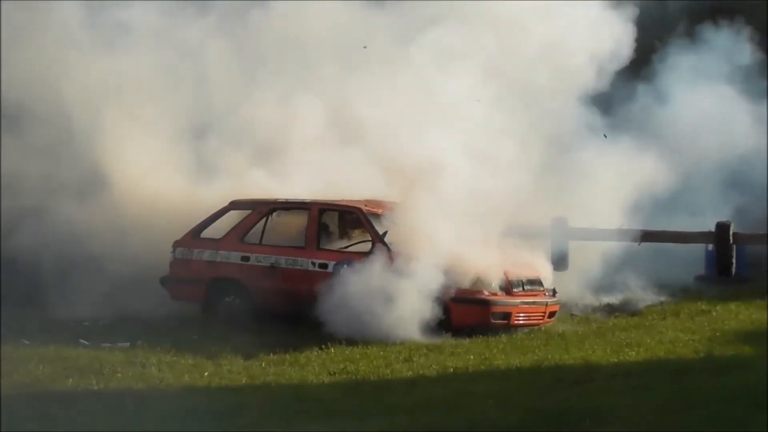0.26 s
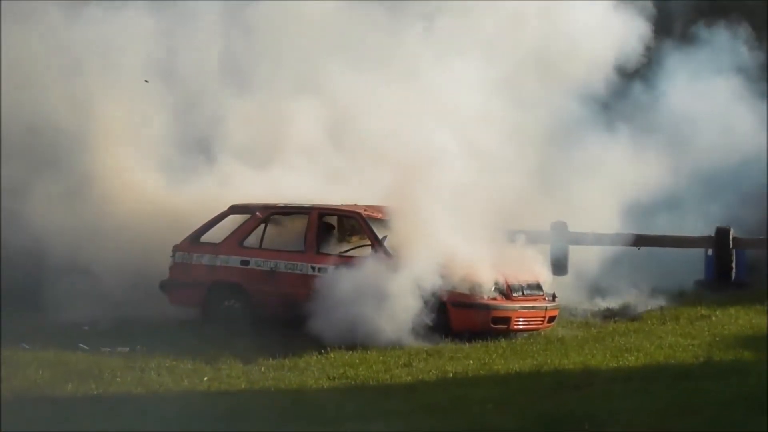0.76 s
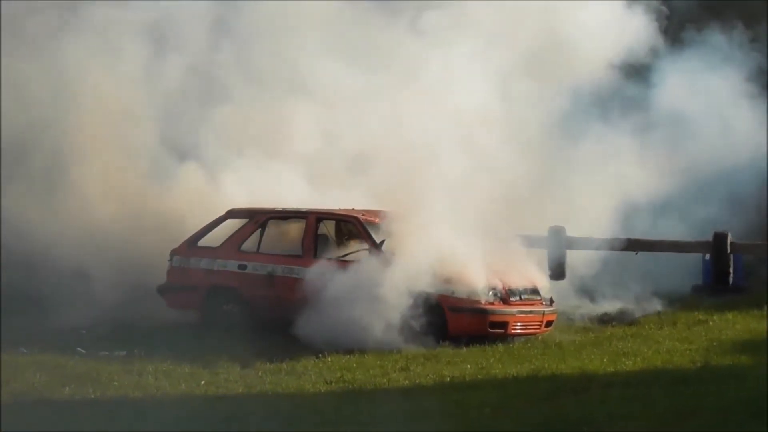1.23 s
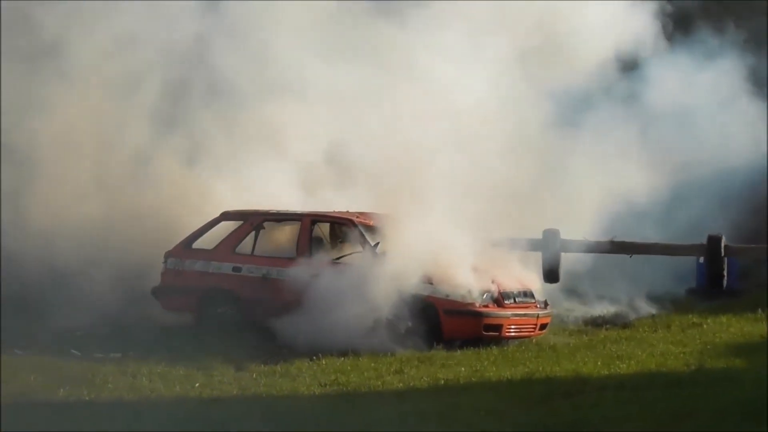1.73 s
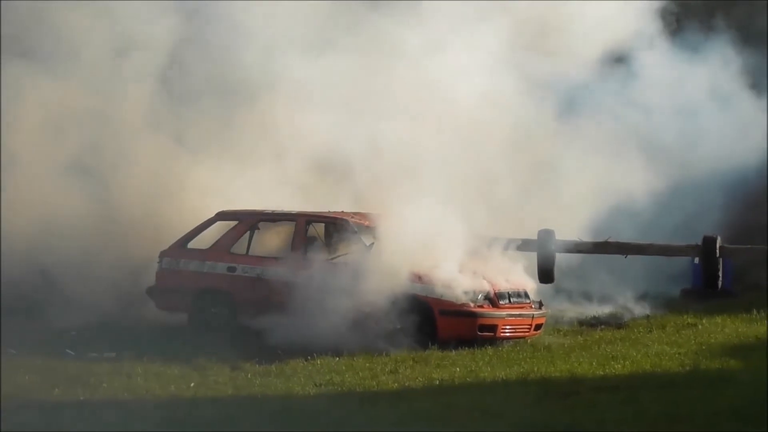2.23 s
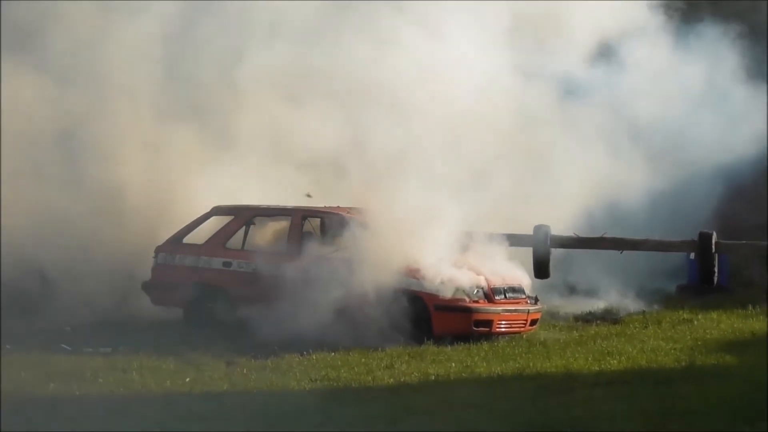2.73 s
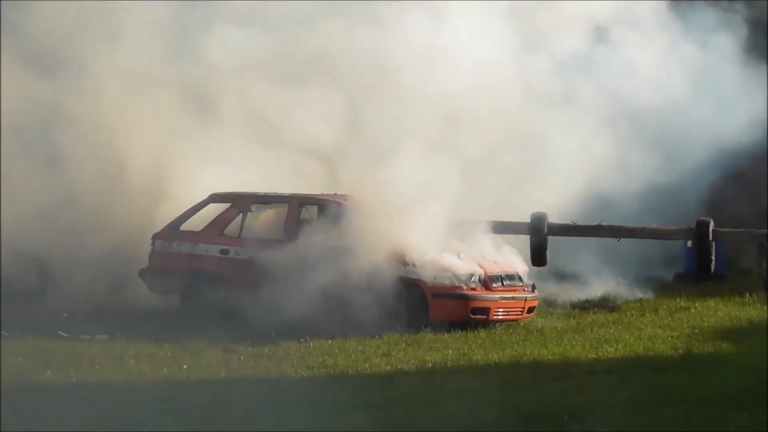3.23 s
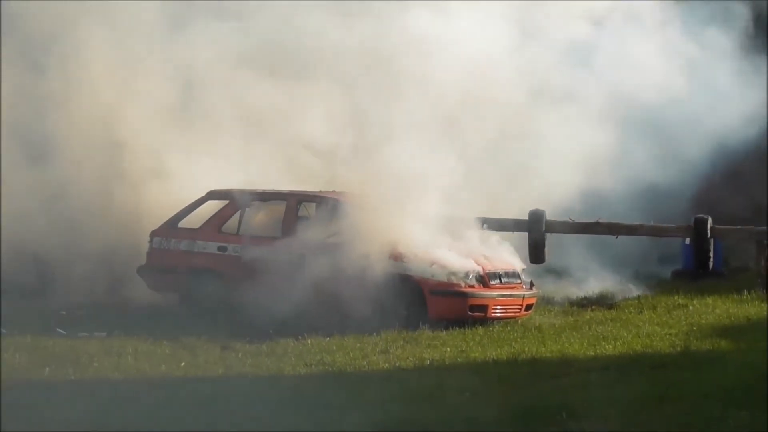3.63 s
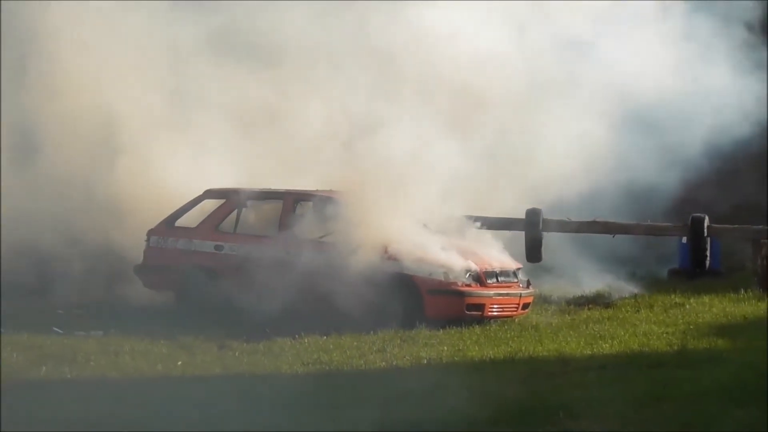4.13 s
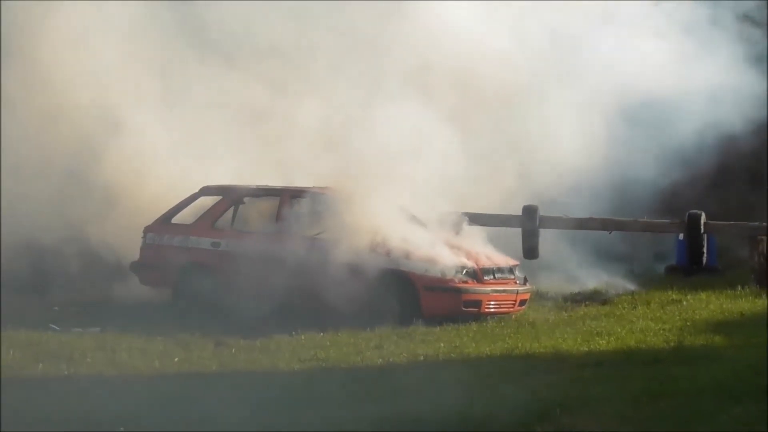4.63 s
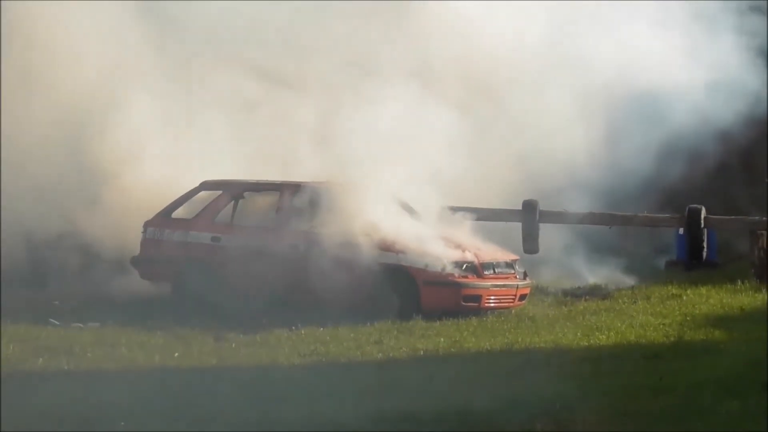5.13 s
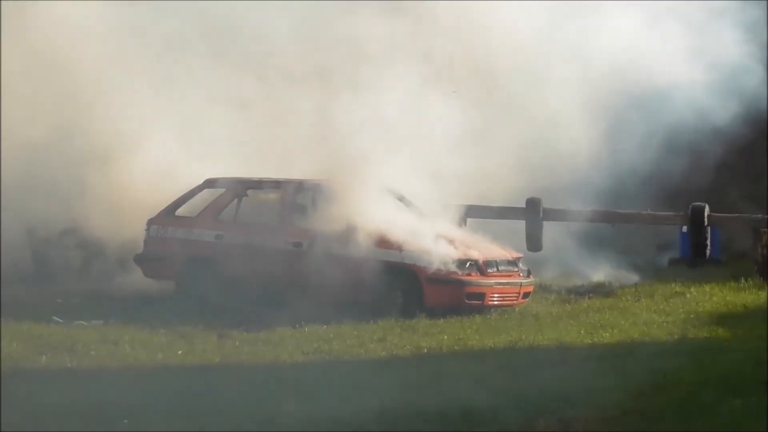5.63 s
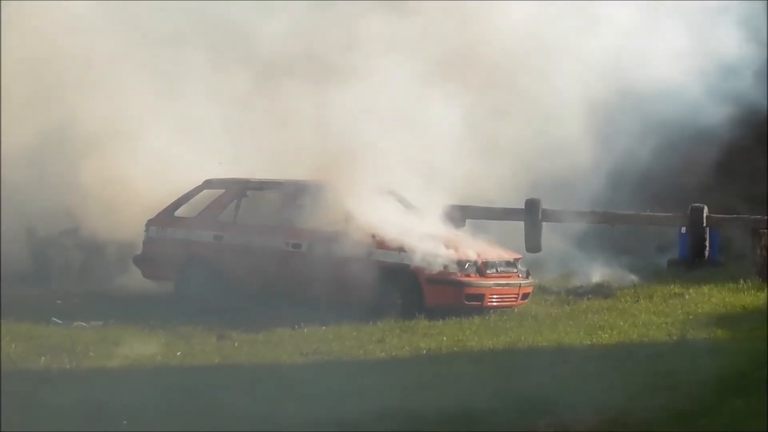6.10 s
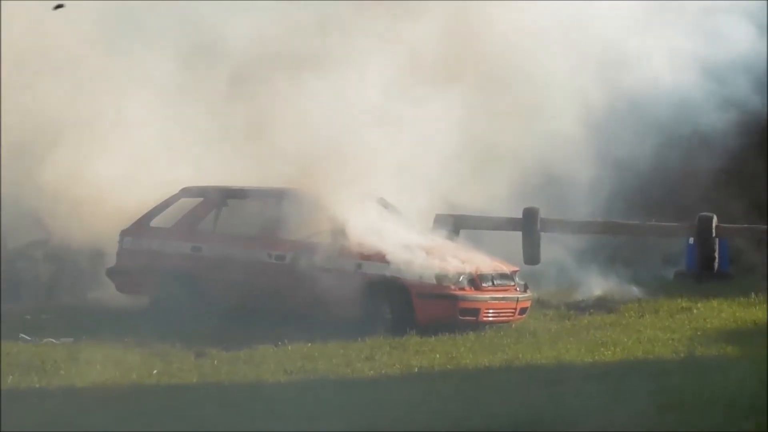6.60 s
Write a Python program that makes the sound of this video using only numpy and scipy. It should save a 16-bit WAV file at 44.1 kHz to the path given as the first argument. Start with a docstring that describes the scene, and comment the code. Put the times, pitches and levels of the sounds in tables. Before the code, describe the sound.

Loud machine gun fire is under way from the start on an outdoor range. A heavy gun pounds steadily at about nine rounds a second, each shot a deep thump with a hard midrange bark. A faster, lighter gun rattles over it until about 0.8 seconds. The heavy gun continues alone while bullets crack and strike downrange. Around 5.1 seconds another heavy gun takes over with a few quick rounds, followed by two-shot bursts at 5.6 and 6.1 seconds and a single shot at 6.8. Brief pings of bullets hitting a car's sheet metal come at about 3.4, 5.4 and 6.3 seconds. Each blast slaps back from nearby walls with a hollow knock, and echoes from trees and distant hills roll through the gaps. The small microphone is close to the firing line and overloads, giving the shots a crunchy edge.

```python
"""A heavy machine gun on an outdoor range, about nine rounds a second, close to an overloaded pocket mic.
The mic is near the firing line. A faster gun joins for the first second; another heavy gun ends the
barrage in short bursts. Each muzzle blast is a pressure wave with a bark of jetting gas. It returns from
nearby walls, scatters off the ground and echoes from the trees, the berm and the distant hills.
Downrange, bullets crack and strike sheet metal."""
import sys
import numpy as np
from scipy import signal
from scipy.io import wavfile

SR = 44100
rng = np.random.default_rng(int(sys.argv[2]) if len(sys.argv) > 2 else 0)


def to_wav(sig):
    """Store sig (one row per channel, or 1-D mono) as 16-bit WAV at the path in sys.argv[1].

    Samples outside -1..1 are clipped; the rate is SR.
    """
    pcm = np.clip(np.atleast_2d(sig), -1, 1) * 32767
    pcm = np.round(pcm).astype(np.int16)
    wavfile.write(sys.argv[1], SR, pcm.T)  # frames by channels


N = 302526

# rounds of the heavy guns: t/s, blast level/dB, bark level/dB
HEAVY_ROUNDS = [(0.0026, -5, -28), (0.106, -7, -8), (0.227, -1.5, -7), (0.3264, -6, -9.5),
                (0.443, -10.5, -12), (0.559, -8, -14), (0.6712, -14, -9), (0.7753, -6.5, -19),
                (0.881, -4, -29), (0.9951, -7, -11.5), (1.1025, -9, -8), (1.2093, -6.5, -12),
                (1.3266, -7.5, -10), (1.4347, -4.5, -12.5), (1.5436, -7, -10.5), (1.652, -6.5, -10),
                (1.7608, -4.5, -12), (1.8728, -4, -21), (1.991, -8, -10.5), (2.0926, -7, -9.5),
                (2.2, -7, -11), (2.3119, -5, -7), (2.428, -7.5, -9), (2.537, -11, -6.5),
                (2.6555, -3.5, -10.5), (2.761, -6.5, -11.5), (2.871, -2.5, -14), (2.972, -5.5, -14),
                (3.0938, -5, -14), (3.2028, -10, -7.5), (3.3152, -6, -9), (3.44, -7.5, -9.5),
                (3.5538, -5, -14), (3.6694, -5.5, -11), (3.784, -7, -12), (3.8974, -2.5, -18),
                (4.019, -5, -16), (4.1393, -4.5, -21), (4.2628, -7, -9.5), (4.3766, -2.5, -11),
                (4.4964, -8, -8), (4.6042, -11.5, -9.5), (4.7198, -5.5, -12.5), (4.84, -3.5, -29),
                (4.9522, -1, -12.5), (5.064, -6, -8.5), (5.143, -3.5, -10), (5.177, -4.5, -11),
                (5.2384, -3, -13), (5.6033, -1.5, -9.5), (5.7026, -3.5, -23), (6.069, -5, -8.5),
                (6.1653, -2.5, -14), (6.8123, -7.5, -6)]
# rounds of the fast gun: t/s, blast level/dB, bullet strike level/dB
FAST_ROUNDS = [(0.022, -26, -15), (0.0946, -4, -16.5), (0.164, -9, -8.5), (0.2352, -19, -9),
               (0.3042, -10, -11), (0.3757, -4, -22), (0.4481, -9, -13), (0.5203, -22, -11),
               (0.595, -2, -14), (0.6652, -8, -12), (0.735, -12, -11), (0.8037, -17, -32)]
HEAVY_TIMES, FAST_TIMES = np.array(HEAVY_ROUNDS)[:, 0], np.array(FAST_ROUNDS)[:, 0]
BAND_EDGES_HZ = 36 * 2 ** np.arange(0, 9.1, .5)   # half octaves
BURSTS_FROM_S = 5.14   # the other heavy gun takes over


def amp(db):
    """Decibels to gain; amp(2 * db) is power."""
    return 10 ** (np.asarray(db) / 20)


def at_hz(points, hz):
    """Reads a curve on a log-frequency axis."""
    freqs, values = np.transpose(points)
    return np.interp(np.log(hz), np.log(freqs), values)


def clicks(seconds, heights):
    """One sample of the given height at each time."""
    out = np.full(N, 1e-18)
    np.add.at(out, (np.asarray(seconds) * SR).astype(int), heights)
    return out


def dying(x, t60):
    """Gives each click a power tail falling 60 dB in t60 seconds."""
    return signal.lfilter([1], [1, -amp(-120 / (t60 * SR))], x)


def smear(x, seconds):
    """One-pole smoothing."""
    r = np.exp(-1 / (seconds * SR))
    return signal.lfilter([1 - r], [1, -r], x)


def ring(x, hz, t60):
    """A damped mode: a unit click sets a sine of height 1 ringing."""
    r, w = amp(-60 / (t60 * SR)), 2 * np.pi * hz / SR
    return signal.lfilter([0, np.sin(w)], [1, -2 * r * np.cos(w), r * r], x)


def flicker(rate_hz):
    """Smooth random wander with spread 1."""
    r = np.exp(-2 * np.pi * rate_hz * 8 / SR)
    slow = signal.lfilter([1], [1, -2 * r, r * r], rng.standard_normal(N // 8 + 1002))[1000:]
    return np.interp(np.arange(N) / 8, np.arange(len(slow)), slow / slow.std())


def band_shares(spectrum):
    """Share of the total power in each band."""
    hz = np.sqrt(BAND_EDGES_HZ[1:] * BAND_EDGES_HZ[:-1])
    power = amp(2 * at_hz(spectrum, hz)) * hz
    return power / power.sum()


def slope_return(rounds, delay_s, spread_s):
    """A distant slope returns each unit click as a late hump of power, height 1."""
    lag = int(delay_s * SR)
    return smear(smear(rounds, spread_s), spread_s)[-N - lag:-lag] * spread_s * SR * np.e


def far_echo():
    """Power per pitch zone: rounds die away in the trees, slap off the berm and roll in from the hills."""
    # zones, low to high: trees level/dB, trees t60/s, berm level/dB, hills level/dB, change for bursts/dB
    zones = [(-25, 0.8, -57, -43.5, -6), (-39, 1, -52, -43, -2), (-31.5, 1.18, -35.5, -48.5, -3),
             (-30, 1.02, -50, -73, 0.5)]
    out = []
    for trees_db, t60, berm_db, hills_db, bursts_db in zones:
        rounds = clicks(HEAVY_TIMES, amp(2 * bursts_db * (HEAVY_TIMES > BURSTS_FROM_S)))
        rounds += clicks(FAST_TIMES, 1)
        rounds = np.concatenate([rounds[:int(0.78 * SR)], rounds])   # the guns are already firing
        trees = smear(dying(rounds, t60), 0.025)[-N:]
        berm = slope_return(rounds, delay_s=0.186, spread_s=0.05)
        hills = slope_return(rounds, delay_s=0.46, spread_s=0.11)
        out.append(amp(2 * trees_db) * trees + amp(2 * berm_db) * berm + amp(2 * hills_db) * hills)
    return out


def bullet_cracks():
    """Treble and midrange power of the strikes downrange: a shock front standing out of its wake."""
    # strikes, most about 0.22 s after a heavy round: t/s, treble level/dB, midrange level/dB
    heavy_strikes = [(0.0877, -15, -26), (0.1574, -12, -10), (0.333, -26, -12), (0.5534, -15.5, -10),
                     (0.9897, -14, -16.5), (1.1653, -19.5, -17), (1.3187, -12, -10.5), (1.3952, -15, -16),
                     (1.5003, -18.5, -16.5), (1.6015, -19.5, -19), (1.8705, -22, -18), (1.932, -23, -14.5),
                     (1.9798, -19, -13), (2.16, -29, -17), (2.3078, -15, -9), (2.4214, -16, -11.5),
                     (2.6478, -14.5, -8.5), (2.8696, -12.5, -12), (3.082, -12, -8), (3.2003, -14, -4),
                     (3.263, -24, -16), (3.3096, -14, -10.5), (3.4236, -14, -12.5), (3.4296, -14, -10),
                     (3.496, -19, -24), (3.547, -17, -20), (3.6037, -19, -13.5), (3.6623, -18.5, -11.5),
                     (3.73, -16.5, -16), (3.7782, -16, -11), (3.8502, -12.5, -18), (3.8911, -14, -15),
                     (4.0055, -15, -12), (4.128, -15, -11.5), (4.1893, -17, -13.5), (4.247, -15, -9.5),
                     (4.307, -20, -14), (4.3693, -14, -15.5), (4.4842, -13, -17), (4.506, -15.5, -18),
                     (4.607, -11, -4.5), (4.6718, -22, -20), (4.7098, -12, -11), (4.8274, -16.5, -10),
                     (4.9482, -12, -14), (5.2794, -11, -11.5), (5.2997, -13, -16), (5.3477, -22, -19),
                     (5.3854, -20.5, -17.5), (5.398, -16.5, -15), (5.444, -26, -14), (5.4806, -21, -20),
                     (5.767, -20, -38), (6.131, -20, -34), (6.204, -16, -32), (6.2277, -22, -38),
                     (6.2595, -20, -43), (6.2937, -14, -23), (6.32, -32, -39), (6.3946, -27, -47)]
    fast_strikes = [(s + 0.203, db, db + 1.5) for s, _, db in FAST_ROUNDS]
    power = np.zeros((2, N + SR))
    for strikes, t60 in ((heavy_strikes, 0.05), (fast_strikes, 0.021)):
        t = np.arange(int(t60 * SR)) / SR
        fall = amp(-120 * t / t60) * (1 + 1.2 * np.exp(-t / 0.00048))
        for s, treble_db, mid_db in strikes:
            i = int(s * SR)
            power[:, i:i + len(fall)] += amp([[2 * treble_db], [2 * mid_db]]) * fall
    return smear(power[:, :N], 0.0011)


def range_scatter(grain_db):
    """Countless small reflections, the cracks and the far echo, as stereo noise shaped band by band."""
    # spectra of each gun's ground scatter, the cracks and the far echo: f/Hz, relative density/dB
    heavy_colour = [(24, -41), (40, -18), (297, 1.5), (810, -6), (990, -8.5), (1150, -13), (1300, -5),
                    (1550, -7.5), (3300, -7), (3560, -9.5), (5440, -14), (7930, -9.5), (9220, -16),
                    (16000, -27.5)]
    fast_colour = [(24, -38), (40, -0.5), (140, 0.5), (176, -37), (256, 8.5), (516, -19), (751, -1),
                   (1440, -12), (2630, -10.5), (5310, -21.5), (7730, -12), (14800, -26.5), (16000, -19)]
    crack_colour = [(400, 3), (900, -4), (2000, 5), (3300, 2), (5200, -3.5), (8000, 3), (11000, -11),
                    (16000, -15)]
    far_colour = [(24, -56), (40, -30), (194, 10.5), (382, 5), (491, -7), (600, 5.5), (1180, -11),
                  (1810, -7.5), (3380, -4.5), (4800, -16.5), (8340, -2), (11300, -24.5), (16000, -62)]
    # scatter of the bursts against the first heavy gun's: f/Hz, gain/dB
    burst_tint = [(60, -1), (300, 1), (800, 2), (2800, -3), (8000, 2), (14000, 3.5)]
    # decay of the scatter: f/Hz, t60/s
    decay = [(50, 0.036), (150, 0.3), (400, 0.057), (1000, 0.21), (3000, 0.23), (8000, 0.21), (14000, 0.16)]
    # borders between the far echo's zones: f/Hz
    zone_tops = [400, 1200, 4500]
    # stereo width: f/Hz, side minus mid/dB
    width = [(40, 11), (110, -6), (200, -12), (380, -9.5), (700, -5), (1290, -3.5), (2380, -8),
             (4800, -11.5), (7500, -23), (10000, 10), (15000, -13)]
    # stereo balance: f/Hz, left minus right/dB
    balance = [(60, 5), (110, -4), (200, -6), (380, -3.5), (700, -1.5), (1290, 1), (2380, 1.5), (4400, 0.5),
               (8120, 0), (15000, 0.5)]
    heavy_share, fast_share = band_shares(heavy_colour), band_shares(fast_colour)
    crack_share, far_share = band_shares(crack_colour), band_shares(far_colour)
    heavy_shots, fast_shots = clicks(HEAVY_TIMES, amp(2 * -12.5)), clicks(FAST_TIMES, amp(2 * -7))
    shock_front = dying(heavy_shots * amp(6.5) + fast_shots * amp(2 * -2), t60=0.0089)
    far_power = far_echo()
    treble_cracks, mid_cracks = bullet_cracks()
    clumps = flicker(380)   # reflections arrive together in all bands
    white = rng.standard_normal((2, 2, N))
    zone = np.searchsorted(zone_tops, BAND_EDGES_HZ[:-1] * 1.19)   # by band centre
    in_bursts = np.arange(N) > BURSTS_FROM_S * SR
    left_right = np.array([[1], [-1]])
    out = 0
    for k, (low, high) in enumerate(zip(BAND_EDGES_HZ, BAND_EDGES_HZ[1:])):
        hz = np.sqrt(low * high)
        t60 = at_hz(decay, hz)
        heavy = heavy_share[k] * dying(heavy_shots * amp(2 * at_hz(burst_tint, hz) * in_bursts), t60)
        fast = fast_share[k] * dying(fast_shots, 1.06 * t60)
        ground = smear(heavy + fast, 0.0043 + 1.75 / hz)   # lows build up later
        cracks = mid_cracks if hz < 3000 else treble_cracks
        sharp = crack_share[k] * (cracks + shock_front * hz / 8000)
        grain = amp(2 * grain_db * (0.64 * clumps + 1.18 * flicker(10 + hz / 40)))
        share_of_zone = far_share[k] / far_share[zone == zone[k]].sum()
        far = share_of_zone * far_power[zone[k]] * amp(1.6 * flicker(12))
        power = (ground + sharp) * grain + far
        band = signal.butter(2, [low, high], "band", fs=SR, output="sos")
        mid, side = signal.sosfilt(band, white[k % 2])   # adjacent bands draw on separate noise
        noise = (mid + side * amp(at_hz(width, hz)) * left_right) / mid.std()
        lean = amp(at_hz(balance, hz) / 2 * left_right)
        out = out + np.sqrt(power) * lean * noise
    return out


def panel_pings():
    """Bullets ring one sheet-metal panel, each mode with a strength that varies from hit to hit."""
    # hits on the panel: t/s, level/dB
    hits = [(3.424, -18), (5.349, -24), (5.395, -19), (5.4015, -14), (5.405, -18), (5.444, -19),
            (6.293, -22)]
    # panel modes: f/Hz, level/dB, t60/s
    modes = [(1770, -2.5, 0.041), (2300, -9, 0.058), (2930, -26, 0.029), (3380, -18, 0.027)]
    times, hit_db = np.transpose(hits)
    chance_db = rng.normal(0, 2.8, (len(hits), len(modes)))
    return sum(ring(clicks(times, amp(hit_db + db + chance_db[:, k])), hz, t60)
               for k, (hz, db, t60) in enumerate(modes))


def jet_noise(power, low_hz, high_hz):
    """A band of noise, partly shared by both mic ports, under a power envelope."""
    noise = 0.5 * rng.standard_normal(N) + 0.45 * rng.standard_normal((2, N))
    band = signal.butter(2, [low_hz, high_hz], "band", fs=SR, output="sos")
    return signal.sosfilt(band, np.sqrt(power) * noise) / signal.sosfilt(band, noise).std()


def muzzle_bark():
    """Gas jetting from the muzzle tears the front of each blast into a few hard midrange swings."""
    heavy_db, fast_db, full_db = np.array(HEAVY_ROUNDS)[:, 2], -7.5, -4.5
    bark = dying(clicks(HEAVY_TIMES, amp(2 * heavy_db)), t60=0.039)
    bark += dying(clicks(FAST_TIMES, amp(2 * fast_db)), t60=0.026)
    roll_db = full_db + 3.1 * (heavy_db - full_db)   # the fiercest rounds keep rolling, deeper
    roll = dying(clicks(HEAVY_TIMES, amp(2 * roll_db)), t60=0.18)
    return jet_noise(bark, low_hz=342, high_hz=1350) + jet_noise(roll, low_hz=237, high_hz=970)


def blast_wave(push_ms, fade):
    """Overpressure that holds, drops through zero and swings into a fading suction."""
    t = np.arange(int(0.038 * SR)) / SR * 1000 / push_ms
    return np.tanh(3 * (1 - t)) * np.exp(-fade * t ** 2)


def firing_line(direct):
    """The direct blasts plus their returns from nearby walls and the hollow knock of the shelter."""
    # hard surfaces close to the mic: delay/ms, left level/dB, right level/dB
    walls = [(7.39, -9, -46), (12, -48, -22), (14.9, -9, -31), (18.1, -25, -14.5), (21.7, -34, -19),
             (24, -19, -6), (28.6, -3, -7), (31.2, -47, -5), (43.6, -38, -27), (53.1, -31, -34)]
    # modes of the firing shelter: f/Hz, left level/dB, right level/dB, t60/s
    shelter = [(146, -22, -19, 0.13), (295, -48, -38, 0.051), (412, -24, -18.5, 0.12),
               (493, -28, -20, 0.067)]
    pressure, return_db = direct
    # small surfaces return little bass
    thin = signal.lfilter(*signal.butter(1, [190, 700], "band", fs=SR), pressure)
    out = pressure.copy()
    for ms, left_db, right_db in walls:
        lag = int(ms * SR / 1000)
        out[:, lag:] += amp([[left_db + return_db], [right_db + return_db]]) * thin[:, :-lag]
    for hz, left_db, right_db, t60 in shelter:
        out += amp([[left_db], [right_db]]) * ring(thin, hz, t60) * 2 * np.pi * hz / SR
    return out


def muzzle_blasts(rounds, push_ms, precursor_db, dull_hz):
    """Each round sends a short opposite precursor, then the main pressure wave."""
    direct = np.zeros((2, N + SR))
    chance = rng.standard_normal((len(rounds), 2, 3))   # each mic port meets its own folds of the front
    lead = int(.0012 * SR)
    for (s, level_db, _), ports in zip(rounds, chance):
        for side, (stretch, tear, strength) in enumerate(ports):
            i = int((s + .00012 * side) * SR)   # the right port hears it later
            precursor = -amp(precursor_db + 2 * tear) * blast_wave(0.61, fade=1.6)
            main = blast_wave(push_ms * amp(1.2 * stretch), fade=.11)
            direct[side, i:i + len(precursor)] += amp(level_db + 4.1 * strength) * precursor
            direct[side, i + lead:i + lead + len(main)] += amp(level_db + 1.1 * strength) * main
    return signal.lfilter(*signal.butter(2, dull_hz, fs=SR), direct[:, :N]) + 1e-18


def scene():
    """The guns close by, then all that the range sends back."""
    heavy = muzzle_blasts(HEAVY_ROUNDS, push_ms=1.9, precursor_db=3, dull_hz=2200)
    fast = muzzle_blasts(FAST_ROUNDS, push_ms=0.4, precursor_db=-32, dull_hz=3000)
    heavy_return_db, fast_return_db = -1.5, -10.0
    guns = firing_line((heavy, heavy_return_db)) + firing_line((fast, fast_return_db)) + muzzle_bark()
    return guns + panel_pings() + range_scatter(grain_db=1.5)


def record(dry):
    """Pocket mic: deep bass drops, the housing colours the sound, the preamp overloads, the top is cut."""
    # housing resonances: f/Hz, width/Hz, gain/dB
    housing = [(439, 150, 4.5), (3540, 790, 2.5), (5270, 6000, -4.5), (7730, 2000, 3)]
    x = signal.lfilter(*signal.butter(1, 35, "high", fs=SR), dry)
    for hz, width_hz, gain_db in housing:
        x = x + (amp(gain_db) - 1) * signal.lfilter(*signal.iirpeak(hz, hz / width_hz, fs=SR), x)
    overloaded = x / (1 + np.abs(x / .97) ** 6) ** (1 / 6)
    top_cut = signal.ellip(10, .5, 65, 15850, fs=SR, output="sos")
    return np.clip(signal.sosfilt(top_cut, overloaded), -1, 1)


dry = scene()
out = record(dry)
to_wav(out)
```